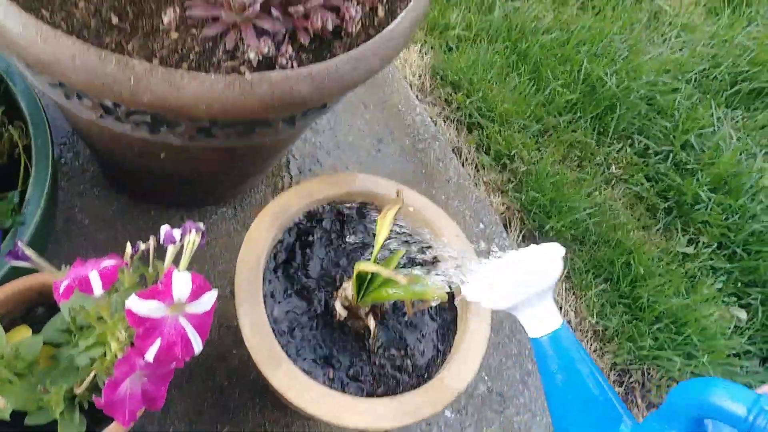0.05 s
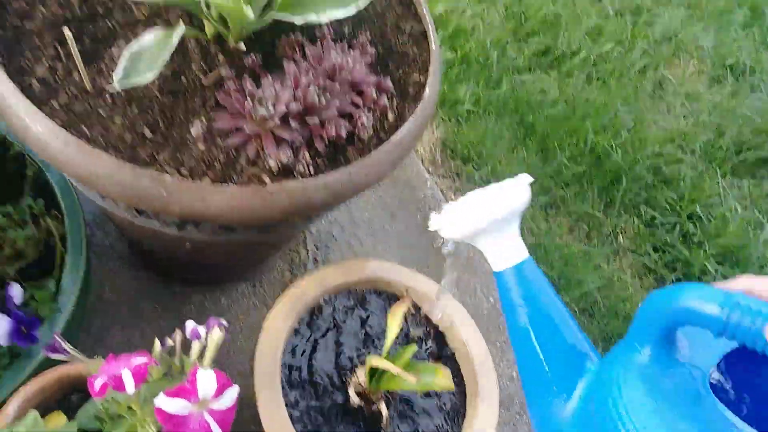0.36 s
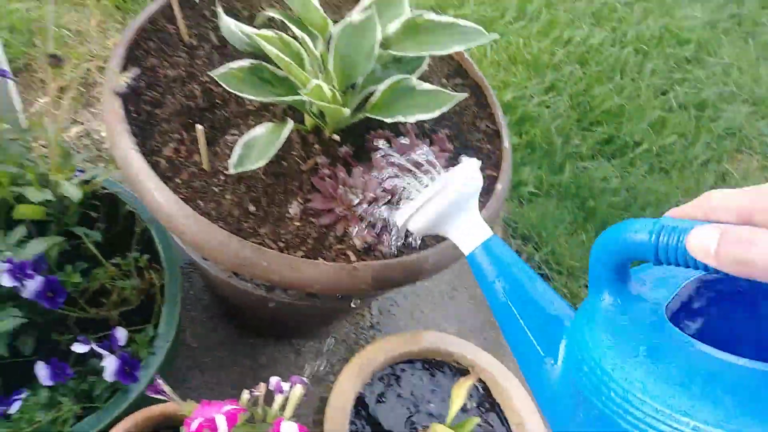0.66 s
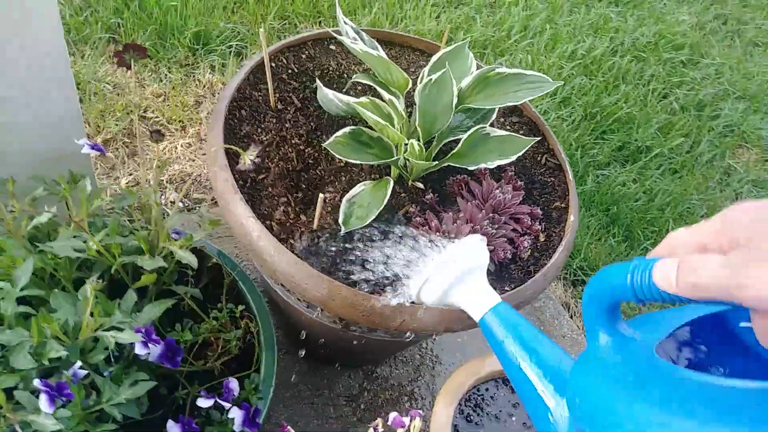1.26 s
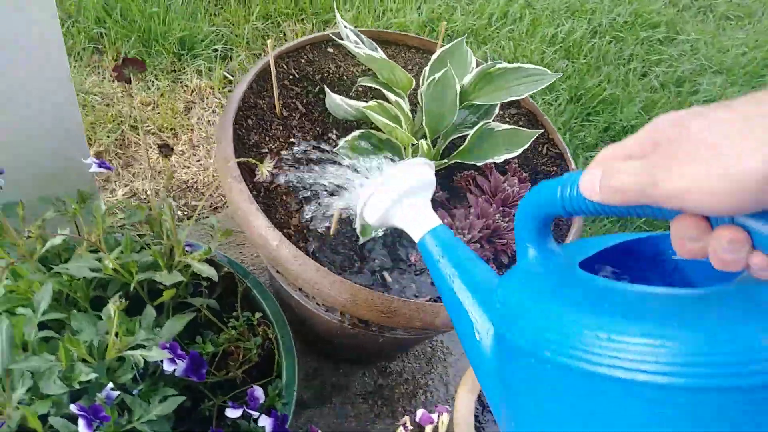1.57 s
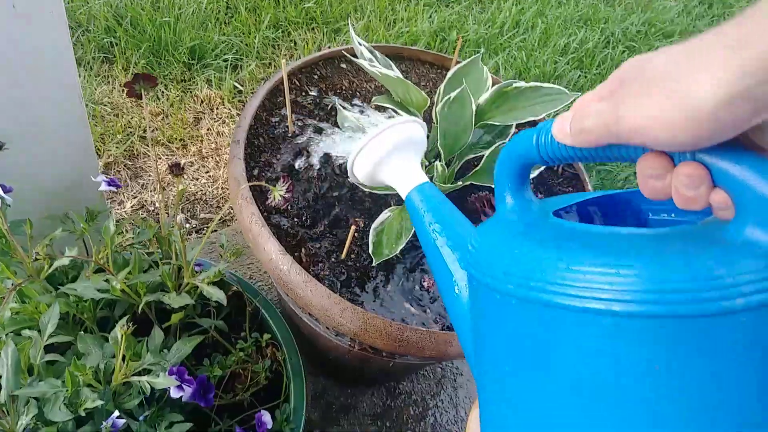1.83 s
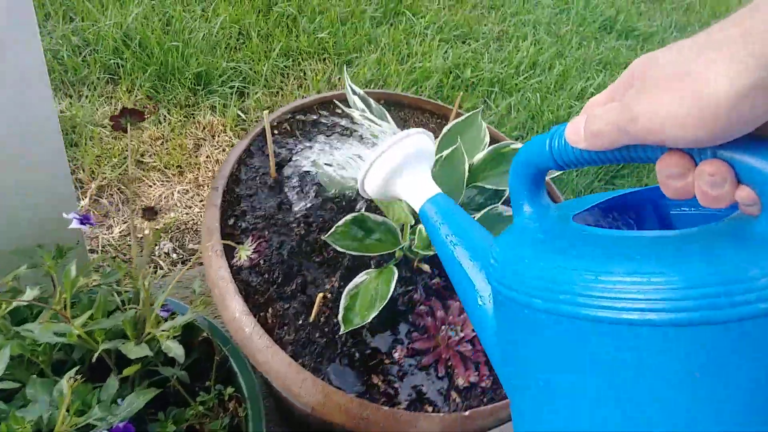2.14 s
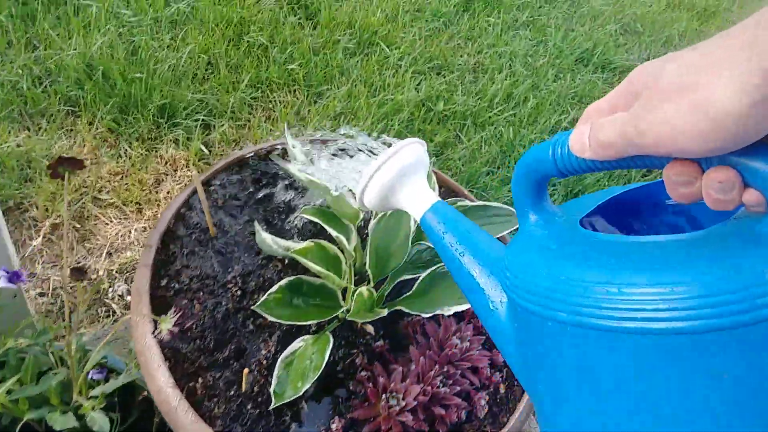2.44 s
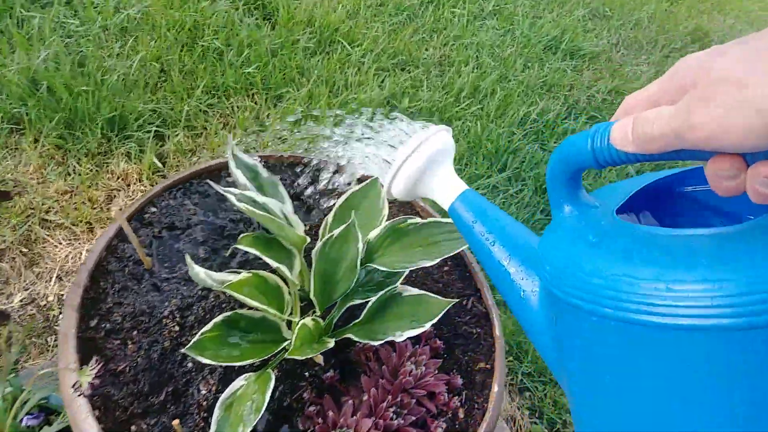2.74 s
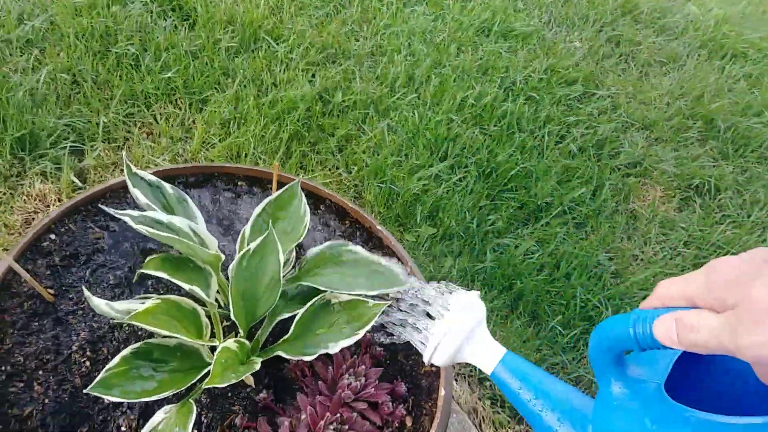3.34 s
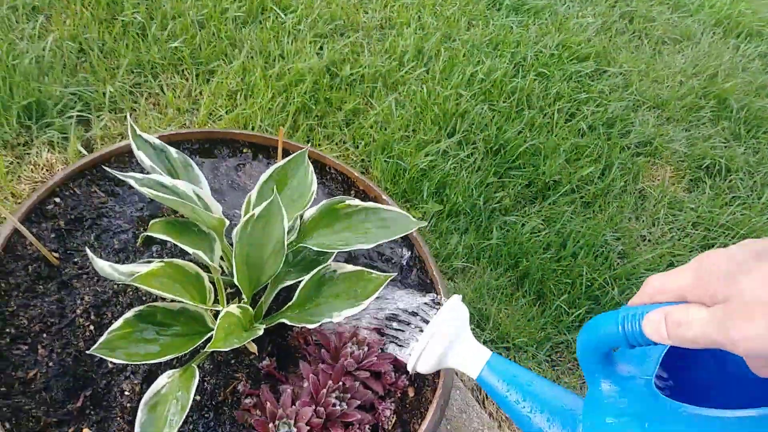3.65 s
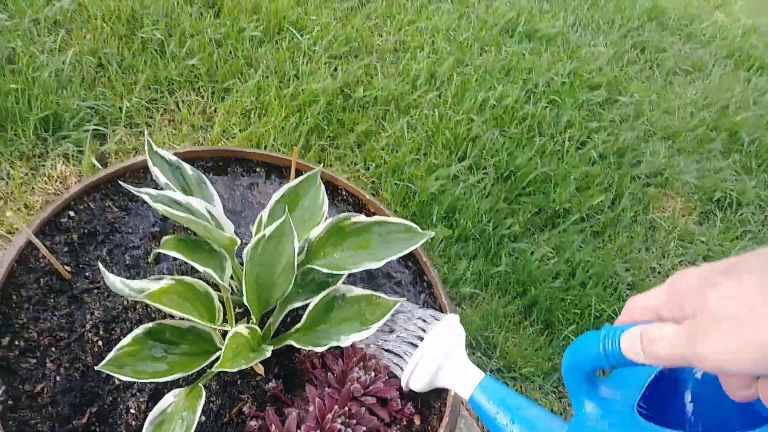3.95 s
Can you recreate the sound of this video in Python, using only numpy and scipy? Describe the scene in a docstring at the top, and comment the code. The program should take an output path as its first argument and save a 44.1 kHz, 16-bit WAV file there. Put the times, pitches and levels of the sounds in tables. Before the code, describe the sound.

Water sprinkles softly from a watering can onto soil and leaves throughout, with a flickering hiss, tiny bubbles and sharper splats, thickest around 2 seconds. The plastic can booms faintly around 1 second, bumps at 3.5 and gives one loud, short hollow knock at 3.7. A distant bird sings falling phrases near 0.2, 0.7, 2.7 and 3.3 seconds over a faint outdoor rumble.

```python
"""Watering can in a quiet garden

Fine drops from a plastic can patter on soil and leaves with ringing bubbles, hollow plops and fat
splats; the spray's treble opens and closes abruptly, as through a noise suppressor. The air in the
can booms softly as it is moved; near the end one loud knock rings its wall and cuts off as if gated.
A distant bird sings four short falling phrases over a faint outdoor rumble."""
import sys
import numpy as np
from scipy import signal
from scipy.fft import rfft, irfft
from scipy.io import wavfile
from scipy.ndimage import uniform_filter1d

SR = 44100
rng = np.random.default_rng(int(sys.argv[2]) if len(sys.argv) > 2 else 0)


def to_wav(sig):
    """Store sig (one row per channel, or 1-D mono) as 16-bit WAV at the path in sys.argv[1].

    Samples outside -1..1 are clipped; the rate is SR.
    """
    pcm = np.clip(np.atleast_2d(sig), -1, 1) * 32767
    pcm = np.round(pcm).astype(np.int16)
    wavfile.write(sys.argv[1], SR, pcm.T)  # frames by channels


N = 176400
T = np.arange(N) / SR

# Table levels are relative: each layer's _DB trim, where it has one, goes on top.
# EQ of the outdoor rumble (f/Hz, level/dB)
GARDEN_EQ = [(25, -25), (45, -4.5), (70, -3.5), (110, -6), (200, 5), (400, 1), (900, 2.5), (2000, -10.5),
             (5000, -22), (16000, -32)]
# fader ride of the far-off hum (t/s, level/dB)
HUM_RIDE = [(0.0, -64.5), (0.6, -75), (2.4, -74), (2.6, -79)]
GARDEN_DB, HUM_HZ, HUM_WAVER_DB = -62.5, 79.5, 1.5

# bird whistles (t/s, length/s, start f/Hz, end f/Hz, level/dB)
BIRD_NOTES = [(0.158, 0.078, 3160, 2157, -52.5), (0.216, 0.043, 2200, 1940, -53),
              (0.226, 0.052, 2980, 2415, -54), (0.26, 0.046, 2290, 2015, -59), (.295, .09, 2420, 2397, -54),
              (.392, .05, 2400, 2416, -55), (0.714, 0.066, 3366, 2580, -47.5),
              (0.783, 0.064, 3140, 2520, -54), (0.787, 0.047, 2130, 2380, -59.5),
              (0.827, 0.083, 2130, 2440, -62), (.845, .05, 3150, 2620, -60), (.895, .065, 3170, 2590, -55),
              (0.919, 0.091, 2285, 2270, -63), (2.701, 0.069, 2920, 2230, -56.5),
              (2.763, 0.086, 2730, 2400, -56), (2.855, 0.033, 2750, 2490, -55),
              (2.848, 0.14, 2385, 2395, -61), (3.252, .062, 3250, 2530, -58.5),
              (3.312, 0.051, 3200, 2495, -50.5), (3.365, .045, 3130, 2790, -61),
              (3.433, 0.046, 3080, 2600, -58), (3.446, 0.11, 2380, 2280, -64.5)]
BIRD_DB, BIRD_WAVER, BIRD_RASP, BIRD_ECHO, BIRD_ECHO_S = -4.0, 0.085, 0.42, 0.65, 0.05

# soft booms of the air in the can (t/s, f/Hz, level/dB)
AIR_BOOMS = [(0.79, 360, -50.5), (0.9, 367, -42), (0.944, 353, -44), (1.174, 364, -36.5), (1.428, 345, -50),
             (1.805, 393, -45.5), (1.83, 260, -46), (3.471, 340, -23), (3.928, 312, -43.5)]
BOOM_ATTACK_S, BOOM_T60_S, BOOM_SAG_PER_S = 0.0042, 0.16, 0.18
# resonances of the knocked can (f/Hz, level/dB, t60/s)
KNOCK_MODES = [(261, -6.8, 0.14), (327, 1.5, 0.18), (450, -1.5, 0.09), (557.5, -7.5, 0.0774),
               (689, -9.5, 0.079), (795, -12, .04), (880, -22, 0.098), (980, -13.5, .05),
               (1456, -1.5, 0.026), (1606, -19, 0.059), (1668, -11, 0.048), (2000, -20, 0.046),
               (2456, -14.5, .02)]
KNOCK_S, KNOCK_DB, KNOCK_ATTACK_S = 3.7284, -8.5, 0.0038
GATE_HOLD_S, GATE_CLOSE_S = 0.042, 0.0016  # the ring drops abruptly, as if gated
TAIL_SHARE, TAIL_DECAY_S = 0.34, 0.05  # the faint tail left after that drop
SNAP_S, SNAP_DB, SNAP_ABOVE_HZ, SNAP_ATTACK_S, SNAP_DECAY_S = 3.7318, -7.5, 1440, 0.0014, 0.0034
# EQ of the scrape in the knock (f/Hz, level/dB)
SCRAPE_EQ = [(130, -43), (240, 9.5), (650, 5.5), (1100, -9.5), (1500, -11.5), (2000, -7.5), (2900, -14),
             (3400, -48)]
SCRAPE_DB, SCRAPE_DECAY_S = -22, 0.024
SLOSH_DB, SLOSH_DECAY_S, SLOSH_WIDTH_HZ = -43, 0.1, 68

# drips landing in the pots (t/s, f/Hz, level/dB, decay/s)
POT_PLOPS = [(0.093, 1400, -44, 0.0091), (0.504, 3030, -51, 0.0042), (1.428, 880, -47.5, 0.014),
             (2.43, 2600, -45.5, 0.0039), (2.856, 3650, -46, .006), (3.084, 1530, -46, 0.013)]
# fat drops on leaves (t/s, level/dB, decay/s, body offset/dB, top offset/dB)
LEAF_SPLATS = [(0.0464, -43.5, 0.0019, -1, 1), (0.1159, -48.5, .003, -1, 7), (.162, -42.5, 0.0024, -7, 8),
               (0.2037, -31.5, 0.00086, -7, -16), (.372, -46.5, 0.0018, 3, -6),
               (0.437, -37.5, 0.0048, -10.5, 3), (0.6007, -43.5, 0.005, -14, -5.5),
               (1.157, -44, 0.0013, -17, 2), (1.266, -37, 0.001, -11, -19),
               (1.321, -41.5, 0.0013, -11, 1.5), (1.595, -33, 0.0012, -18, -24),
               (1.7133, -52.5, 0.0013, 0, 10.5), (1.9625, -32.5, 0.002, -15, -23),
               (2.046, -24, 0.0012, -27, -21), (2.065, -28.5, 0.0017, -9.5, -5),
               (2.098, -25, 0.00089, -20, -11), (2.141, -37.5, 0.0013, -11, 3),
               (2.171, -33, .0008, -22, -16), (2.258, -41, .0015, -8, -0.5),
               (2.2835, -35.5, 0.001, -2, -10), (2.3258, -31.5, 0.0023, -20, -18),
               (2.6414, -43.5, 0.0021, 1, 0), (2.779, -46.5, 0.001, 4.5, -14),
               (3.0284, -35.5, 0.0017, -11, -25), (3.087, -31, 0.002, -17, -13),
               (3.1887, -31, 0.0017, -27, -5), (3.615, -44, 0.004, -10.5, -2.5),
               (3.721, -25, 0.0012, -23, -11), (3.8041, -26, 0.0011, -17, -1.5),
               (3.918, -34, 0.0013, -25, -22)]
# EQs of a splat's three bands (f/Hz, level/dB)
SPLAT_BODY_EQ = [(400, -31), (1000, -2), (2000, -3.5), (3500, 4), (4800, 6.5), (5600, -15)]
SPLAT_MID_EQ = [(4750, -34.5), (5080, 4.5), (5700, 0), (6400, -3.5), (7300, -5), (8100, -19)]
SPLAT_TOP_EQ = [(7200, -21), (7900, 2.5), (11500, 8), (16000, -4)]
SPLAT_DB, SPLAT_BODY_DB, SPLAT_TOP_DB, SPLAT_ATTACK_S = 0.5, 2.5, -1, 0.00028

# EQs of the spray's six bands, from dull soil up to airy mist (f/Hz, level/dB)
SOIL_EQ = [(130, -23), (210, 4.5), (400, 1), (800, -1), (1100, -7), (1600, -13), (2600, -24.5)]
PATTER_EQ = [(900, -22.5), (1500, 2.5), (2500, 0), (3600, 4.5), (4900, -1), (5600, -18)]
SIZZLE_EQ = [(4750, -28), (5080, 1), (5800, 1), (6200, -11.5), (7300, -7.5), (8100, -25)]
HISS_EQ = [(5800, -31), (6150, -1.5), (7500, 2), (8000, -22.5)]
FIZZ_EQ = [(7200, -7), (7900, 0), (9200, -1), (10200, 1.5), (11800, 3), (12600, -28)]
MIST_EQ = [(11400, -22), (12300, -2.5), (14000, -2), (16000, -8.5)]
# fader rides of the spray on soil and on leaves (t/s, level/dB)
SOIL_RIDE = [(0.0, -58), (0.55, -68), (1.38, -65), (1.44, -51), (1.46, -71), (1.54, -63.5), (1.78, -70),
             (1.81, -51.5), (1.92, -72.5), (2.07, -61.5), (2.95, -65), (3.24, -60.5), (3.26, -71),
             (3.68, -66)]
PATTER_RIDE = [(0.0, -66.5), (0.22, -70), (0.29, -76), (0.6, -71.5), (0.65, -73), (0.75, -72),
               (0.81, -77.5), (1.28, -67), (1.6, -75), (1.85, -68.5), (1.9, -75), (2.11, -63.5),
               (2.24, -69), (2.37, -64.5), (2.58, -77), (2.63, -69), (2.7, -66), (2.93, -66), (3.22, -66),
               (3.34, -77), (3.64, -71), (3.77, -61.5), (3.85, -68), (4.0, -59)]
# treble bands opening and closing abruptly, as through a noise suppressor (t/s, level/dB)
SIZZLE_GATING = [(0.0, -52), (0.08, -51), (0.13, -64), (0.22, -51.5), (0.33, -76), (0.35, -65), (0.42, -69),
                 (0.45, -49.5), (0.58, -68.5), (0.61, -61), (0.71, -80), (0.75, -66), (0.79, -82),
                 (1.0, -69), (1.04, -58), (1.13, -80), (1.17, -54.5), (1.26, -58), (1.28, -56), (1.31, -56),
                 (1.37, -54), (1.55, -71), (1.57, -50.5), (1.61, -56), (1.68, -80), (1.82, -60), (1.9, -65),
                 (1.92, -51), (1.95, -72), (1.96, -49.5), (2.15, -46), (2.27, -59), (2.29, -50),
                 (2.37, -42.5), (2.58, -73), (2.65, -49), (2.76, -69), (2.83, -50.5), (2.91, -69),
                 (3.03, -50.5), (3.13, -47), (3.22, -53.5), (3.26, -68), (3.29, -57.5), (3.47, -85),
                 (3.52, -56), (3.59, -79.5), (3.62, -54), (3.67, -66), (3.7, -55), (3.73, -42), (3.75, -49),
                 (3.82, -44), (3.89, -58), (3.92, -46.5), (4.0, -46)]
HISS_GATING = [(0.0, -72), (0.41, -72), (0.44, -53), (0.59, -78), (0.6, -57), (0.67, -78), (1.0, -72),
               (1.04, -51), (1.12, -80), (1.16, -42), (1.24, -70), (1.35, -61), (1.369, -44), (1.51, -73.5),
               (1.6, -61), (1.66, -74), (1.88, -74), (2.07, -48), (2.26, -72), (2.37, -45), (2.52, -81),
               (2.67, -59), (2.7, -72), (2.84, -66), (2.9, -71), (3.12, -47.5), (3.17, -58), (3.19, -42.5),
               (3.25, -78), (3.6, -74), (3.62, -50), (3.7, -70), (3.72, -43), (3.84, -51), (3.89, -68),
               (3.92, -44.5), (3.98, -53), (4.0, -47)]
FIZZ_GATING = [(0.0, -69), (0.16, -59.5), (0.21, -72), (0.42, -76), (0.46, -55.5), (0.59, -81), (0.61, -64),
               (0.66, -77), (0.959, -74), (1.04, -58.5), (1.14, -64.5), (1.17, -51.5), (1.26, -74.5),
               (1.39, -59), (1.51, -75), (1.7, -78), (1.72, -67), (1.83, -72), (2.03, -71), (2.06, -47),
               (2.14, -57), (2.16, -67), (2.3, -80), (2.32, -49), (2.49, -73), (2.5, -59.5), (2.58, -73.5),
               (2.67, -60), (2.69, -65), (2.91, -78), (2.93, -65), (3.07, -64.5), (3.12, -48.5),
               (3.41, -82.5), (3.52, -71), (3.589, -87), (3.62, -57), (3.7, -74), (3.73, -46), (3.82, -50),
               (3.89, -75), (3.93, -46), (4.0, -51)]
MIST_GATING = [(0.0, -64), (0.06, -52), (0.09, -76), (0.18, -56), (0.21, -70), (0.38, -74), (0.46, -63),
               (0.59, -82), (0.9, -77), (1.01, -59.5), (1.13, -74), (1.18, -58), (1.19, -72), (1.29, -74),
               (1.34, -53), (1.52, -76), (1.7, -75), (1.72, -59), (1.79, -78), (1.84, -69), (1.94, -75),
               (2.14, -65), (2.24, -69), (2.38, -46), (2.48, -70), (2.58, -75), (2.67, -65), (2.74, -70),
               (3.2, -67), (3.4, -80), (3.6, -82), (3.62, -63), (3.69, -81), (3.73, -49), (3.81, -51),
               (3.89, -72), (3.91, -62.5), (4.0, -59)]
SOIL_DB, PATTER_DB, SIZZLE_DB, HISS_DB, FIZZ_DB, MIST_DB = 3.5, 3.5, -4, -3.5, 0, -1
DROPS_PER_S, DROP_SCATTER_DB, DROP_MAX_DB, DROP_DECAY_S, WASH = 1500, 4.5, 26.5, 0.00091, 0.23
PATTER_HARDNESS = 0.78  # below 1 softens the drops on leaves
OWN_DROPS = 0.24  # share of a treble band's power from drops heard in it alone
BUBBLE_DB, PLINK_DB, BUBBLE_RISE = 0.5, -9.5, 0.044


def undb(db):
    """Decibels to gain."""
    return 10 ** (np.asarray(db) / 20)


def unit(x):
    """Scale to rms 1."""
    return x / np.sqrt(np.mean(x ** 2) + 1e-20)


def fader(levels):
    """Gain over time from (t/s, level/dB) rows."""
    return undb(np.interp(T, *np.array(levels).T))


def equalise(x, eq):
    """Minimum-phase EQ through (f/Hz, level/dB) points that keeps the power of white noise."""
    hz, db = np.array(eq).T
    log_f = np.log(np.arange(N + 1) * SR / (2 * N) + 1)
    outside = np.maximum(np.log(hz[0]) - log_f, 0) + np.maximum(log_f - np.log(hz[-1]), 0)
    rolloff_db = np.minimum(60 * outside, 60)
    gain = unit(undb(np.interp(log_f, np.log(hz), db) - rolloff_db))
    cepstrum = irfft(np.log(gain))
    cepstrum[1:N] *= 2
    cepstrum[N + 1:] = 0
    return irfft(rfft(x, 2 * N) * np.exp(rfft(cepstrum)))[:N]


def wander(rate_hz):
    """Smooth random modulation at rms 1."""
    step = int(SR / rate_hz)
    return unit(uniform_filter1d(np.repeat(rng.standard_normal(N // step + 1), step), step)[:N])


def ringing_noise(hz, width_hz, samples):
    """Noise through one resonance, at rms 1."""
    resonance = signal.iirpeak(hz, hz / width_hz, fs=SR)
    return unit(signal.lfilter(*resonance, rng.standard_normal(samples)))


def add(out, start, sound):
    """Mix a sound in at start seconds."""
    i = int(np.clip(start * SR, 0, N - 1))
    out[i:i + len(sound)] += sound[:N - i]


def garden():
    """A bed of faint outdoor rumble with a wavering far-off hum."""
    hz = HUM_HZ * (1 + 0.03 * wander(8.2))
    hum = np.sin(2 * np.pi * np.cumsum(hz) / SR) * fader(HUM_RIDE) * undb(HUM_WAVER_DB * wander(27))
    rumble = equalise(rng.standard_normal(N), GARDEN_EQ) * undb(GARDEN_DB)
    return rumble + hum


def bird():
    """Whistles, mostly falling and rougher the further they glide, blurred by garden echoes."""
    song = np.zeros(N)
    waver, rasp = wander(400), 1 + BIRD_RASP * wander(500)
    for start, length, from_hz, to_hz, db in BIRD_NOTES:
        progress = np.linspace(0, 1, int(length * SR))
        glide_hz = from_hz + (to_hz - from_hz) * progress
        depth = BIRD_WAVER * abs(1 - to_hz / from_hz)
        hz = glide_hz * (1 + depth * np.interp(start + length * progress, T, waver))
        swell = np.sqrt(np.abs(np.sin(np.pi * progress)))
        add(song, start, undb(db + BIRD_DB) * swell * np.sin(2 * np.pi * np.cumsum(hz) / SR))
    song *= rasp
    echo = rng.standard_normal(SR // 2) * np.exp(-T[:SR // 2] / BIRD_ECHO_S)
    return song + BIRD_ECHO * signal.fftconvolve(song, echo / np.linalg.norm(echo))[:N]


def booms():
    """Light bumps ring only the air inside the can, sagging a little in pitch."""
    out, t = np.zeros(N), T[:SR // 3]
    for start, hz, db in AIR_BOOMS:
        envelope = (1 - np.exp(-t / BOOM_ATTACK_S)) * np.exp(-np.log(1000) * t / BOOM_T60_S)
        phase = 2 * np.pi * hz * t * (1 - BOOM_SAG_PER_S * t / 2)
        add(out, start, -undb(db) * envelope * np.sin(phase))
    return out


def knock():
    """The can scrapes, snaps and rings; after about 40 ms the ring drops to a faint tail, as if gated."""
    out, scrape, t = np.zeros(N), np.zeros(N), T[:SR // 3]
    since_hold = np.maximum(t - GATE_HOLD_S, 0)
    gate = np.exp(-since_hold / GATE_CLOSE_S)
    release = TAIL_SHARE * np.exp(-since_hold / TAIL_DECAY_S) + (1 - TAIL_SHARE) * gate
    knock_envelope = (1 - np.exp(-(t / KNOCK_ATTACK_S) ** 2)) * release
    snap_envelope = (1 - np.exp(-(t / SNAP_ATTACK_S) ** 2)) * np.exp(-t / SNAP_DECAY_S)
    for hz, db, t60 in KNOCK_MODES:
        ring = undb(db) * np.exp(-np.log(1000) * t / t60) * np.sin(2 * np.pi * hz * t)
        brightness = hz ** 2 / (hz ** 2 + SNAP_ABOVE_HZ ** 2)
        add(out, KNOCK_S, undb(KNOCK_DB) * ring * knock_envelope)
        add(out, SNAP_S, undb(SNAP_DB) * ring * snap_envelope * brightness)
    add(scrape, KNOCK_S, rng.standard_normal(len(t)) * np.exp(-t / SCRAPE_DECAY_S) * gate)
    return out + undb(SCRAPE_DB) * equalise(scrape, SCRAPE_EQ)


def slosh():
    """Water jolted by the knock keeps the air in the can murmuring at its strongest mode."""
    out, t = np.zeros(N), T[:SR // 2]
    hz = max(KNOCK_MODES, key=lambda mode: mode[1])[0]
    murmur = ringing_noise(hz, SLOSH_WIDTH_HZ, len(t))
    add(out, KNOCK_S, undb(SLOSH_DB) * murmur * np.exp(-t / SLOSH_DECAY_S))
    return out


def can(low_cut_hz=220):
    """Booms, knock and slosh, without the deep bass that so small a body cannot radiate."""
    low_cut = signal.butter(5, low_cut_hz, "highpass", fs=SR, output="sos")
    return signal.sosfilt(low_cut, booms() + knock() + slosh())


def plops(width_hz=180):
    """Drips land in the pots with a short, hollow ring."""
    out, t = np.zeros(N), T[:SR // 10]
    for start, hz, db, decay in POT_PLOPS:
        add(out, start, undb(db) * ringing_noise(hz, width_hz, len(t)) * np.exp(-t / decay))
    return out


def splats():
    """Fat drops burst on the leaves, each with its own balance of body, mid and top."""
    bands, t = np.zeros((3, N)), T[:SR // 20]
    for start, db, decay, body_db, top_db in LEAF_SPLATS:
        envelope = (1 - np.exp(-t / SPLAT_ATTACK_S)) * np.exp(-t / decay)
        for band, tilt_db in zip(bands, (body_db + SPLAT_BODY_DB, 0, top_db + SPLAT_TOP_DB)):
            add(band, start, undb(db + tilt_db + SPLAT_DB) * envelope * rng.standard_normal(len(t)))
    return sum(equalise(x, eq) for x, eq in zip(bands, (SPLAT_BODY_EQ, SPLAT_MID_EQ, SPLAT_TOP_EQ)))


def bubbles(per_s, centre_hz, spread_octaves, cycles):
    """Small bubbles ring briefly and rise in pitch on the wet soil."""
    out, t = np.zeros(N), T[:SR // 40]
    for when, pitch, softness in rng.random((int(per_s * N / SR), 3)):
        hz = centre_hz * 2 ** (spread_octaves * (2 * pitch - 1))
        age = t * hz / cycles
        phase = 2 * np.pi * hz * t * (1 + BUBBLE_RISE * np.minimum(age, 2) / 2)
        envelope = age * np.exp(-2 * age) / np.sqrt(softness + 0.038)
        add(out, when * N / SR, envelope * np.sin(phase))
    return unit(out)


def drop_envelope():
    """Fine drops of very unequal size, each a tiny spike, over the wash of running water."""
    size = undb(np.minimum(DROP_SCATTER_DB * rng.exponential(size=N), DROP_MAX_DB))
    impacts = (rng.random(N) < DROPS_PER_S / SR) * size ** 2
    power = signal.lfilter([1], [1, -np.exp(-2 / (DROP_DECAY_S * SR))], impacts)
    power /= uniform_filter1d(power, SR // 10) + 1e-9  # level out over 0.1 s
    return unit(np.sqrt(np.abs(power) + WASH ** 2))


def spray_band(grain, eq, levels, db):
    """Noise made grainy by a drop envelope, then EQed and shaped by a level curve."""
    return equalise(grain * rng.standard_normal(N), eq) * fader(levels) * undb(db)


def spray():
    """The shower bubbles and thuds on soil, patters on leaves and sizzles in a flickering treble."""
    shower = drop_envelope()
    burble = bubbles(per_s=170, centre_hz=3295, spread_octaves=0.615, cycles=5.1)
    plinks = bubbles(per_s=130, centre_hz=5500, spread_octaves=0.13, cycles=5.4)
    out = burble * fader(PATTER_RIDE) * undb(BUBBLE_DB)
    out += plinks * fader(SIZZLE_GATING) * undb(PLINK_DB)
    out += spray_band(drop_envelope(), SOIL_EQ, SOIL_RIDE, SOIL_DB)
    out += spray_band(unit(shower ** PATTER_HARDNESS), PATTER_EQ, PATTER_RIDE, PATTER_DB)
    for eq, gating, db in [(SIZZLE_EQ, SIZZLE_GATING, SIZZLE_DB), (HISS_EQ, HISS_GATING, HISS_DB),
                           (FIZZ_EQ, FIZZ_GATING, FIZZ_DB), (MIST_EQ, MIST_GATING, MIST_DB)]:
        grain = np.sqrt((1 - OWN_DROPS) * shower ** 2 + OWN_DROPS * drop_envelope() ** 2)
        out += spray_band(grain, eq, gating, db)
    return out


def scene():
    """Water, can, bird and garden in a mono mix."""
    return (spray() + splats() + plops() + can() + bird() + garden())[None]


def record(dry):
    """A steep high cut at 16.1 kHz on the whole mix."""
    return signal.sosfilt(signal.ellip(10, .2, 80, 16100, fs=SR, output="sos"), dry)


dry = scene()
out = record(dry)
to_wav(out)
```